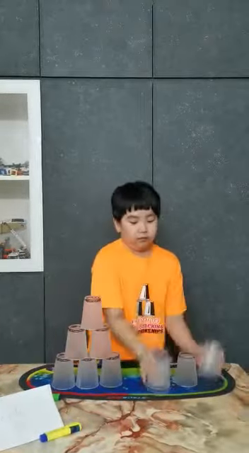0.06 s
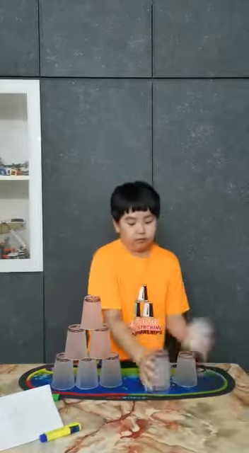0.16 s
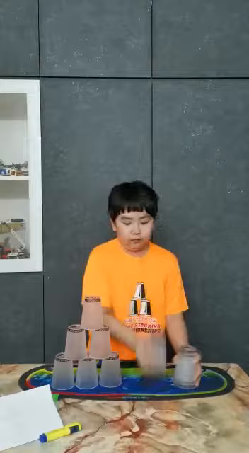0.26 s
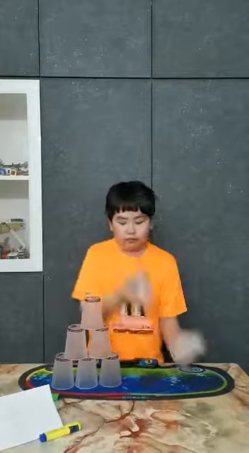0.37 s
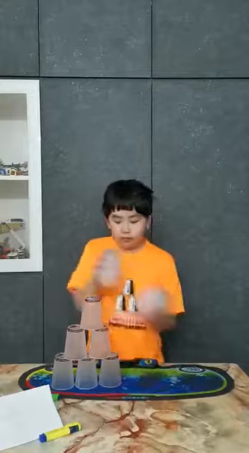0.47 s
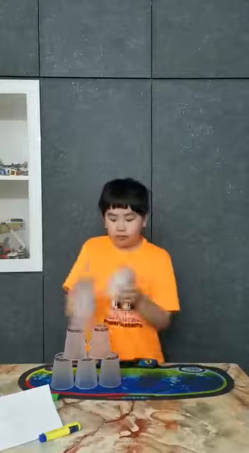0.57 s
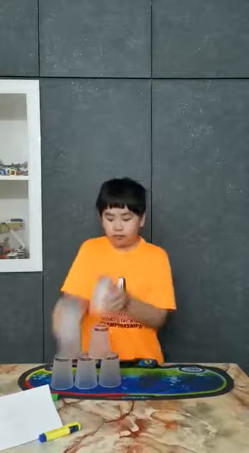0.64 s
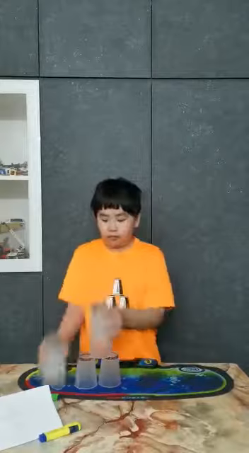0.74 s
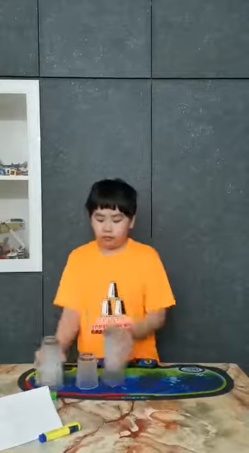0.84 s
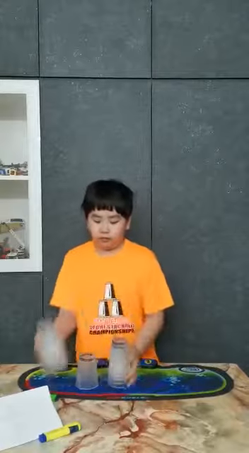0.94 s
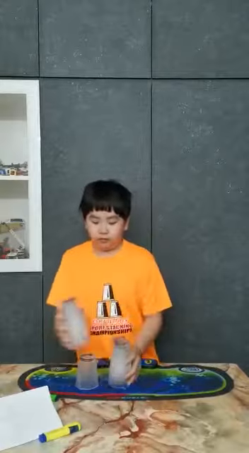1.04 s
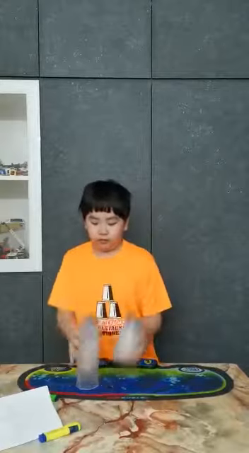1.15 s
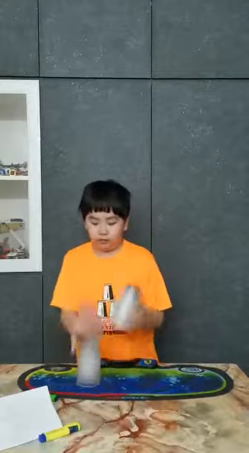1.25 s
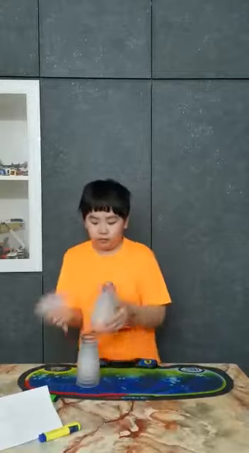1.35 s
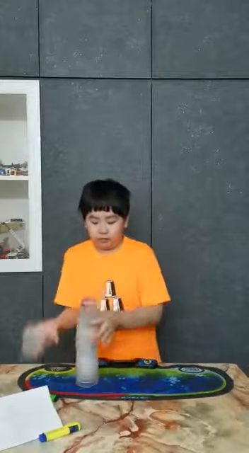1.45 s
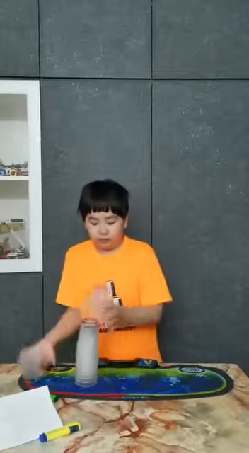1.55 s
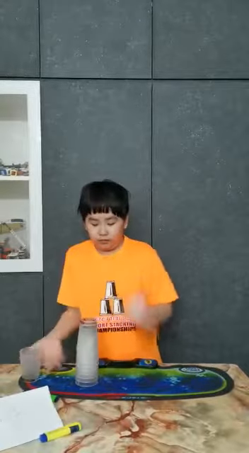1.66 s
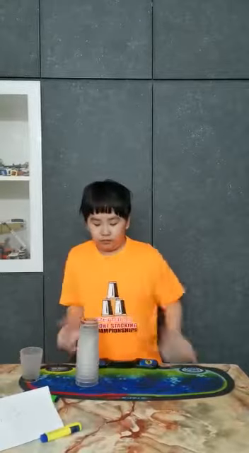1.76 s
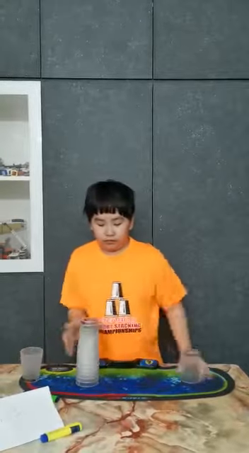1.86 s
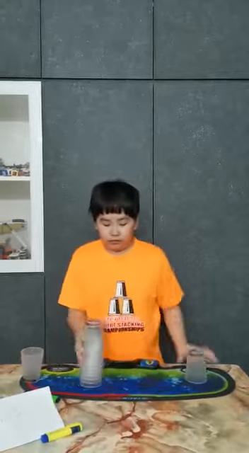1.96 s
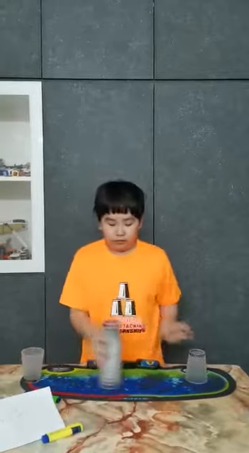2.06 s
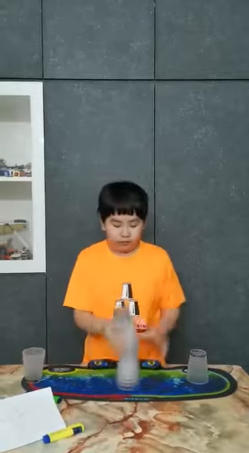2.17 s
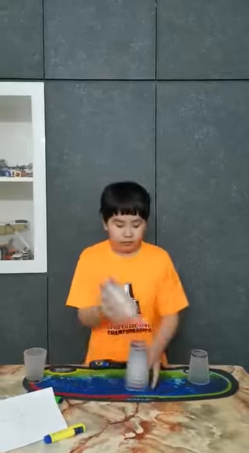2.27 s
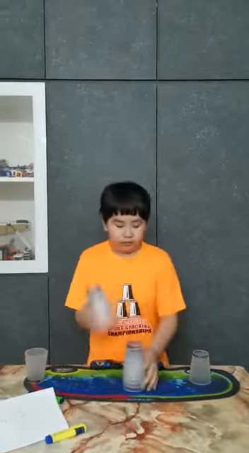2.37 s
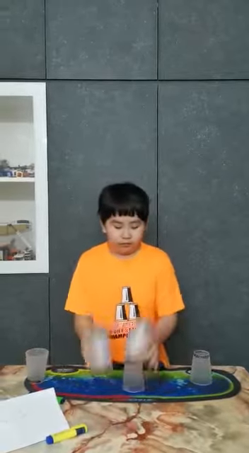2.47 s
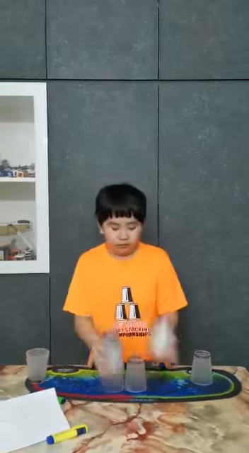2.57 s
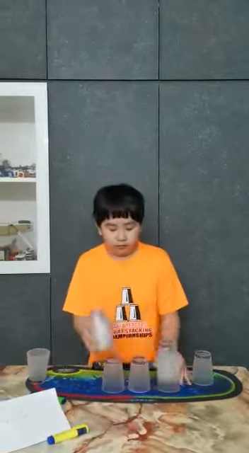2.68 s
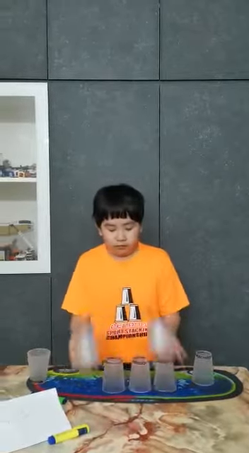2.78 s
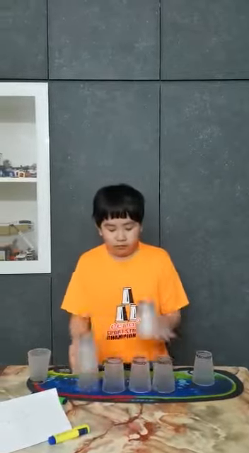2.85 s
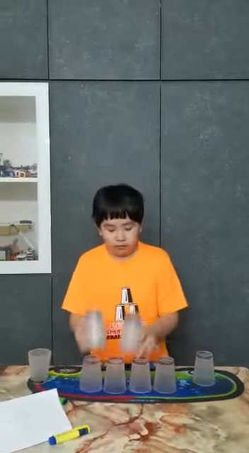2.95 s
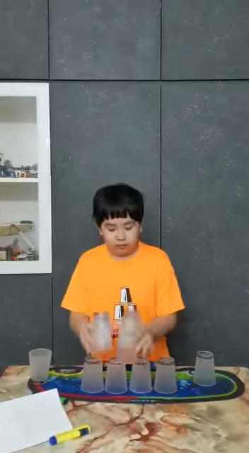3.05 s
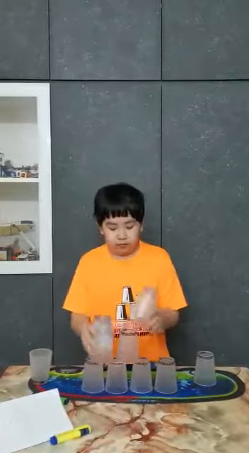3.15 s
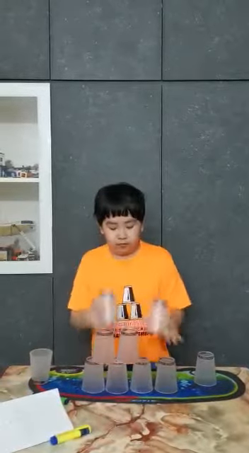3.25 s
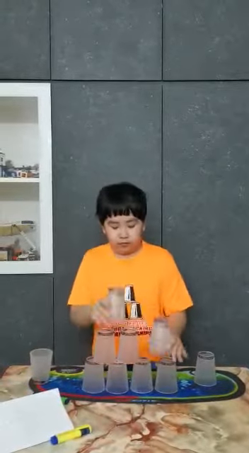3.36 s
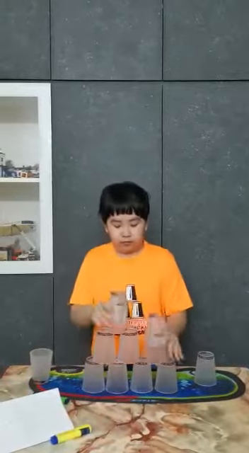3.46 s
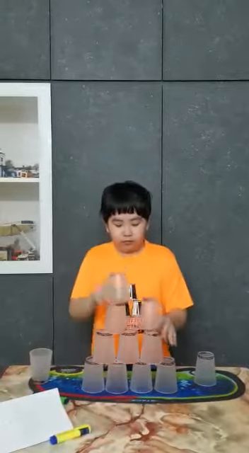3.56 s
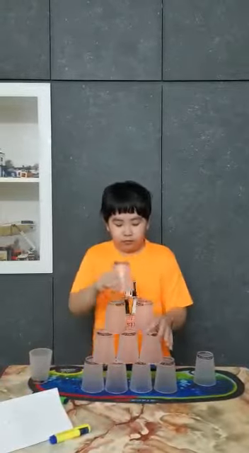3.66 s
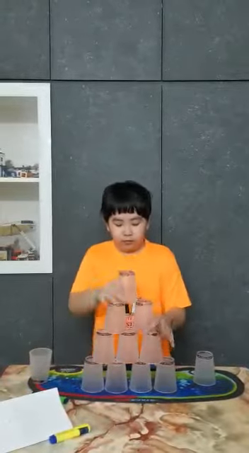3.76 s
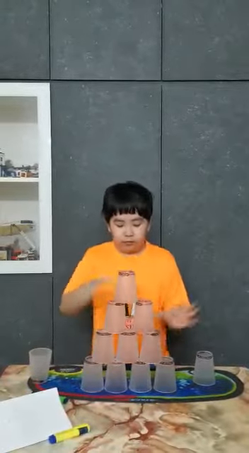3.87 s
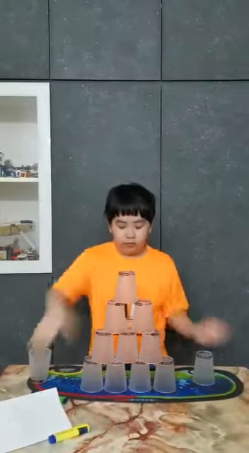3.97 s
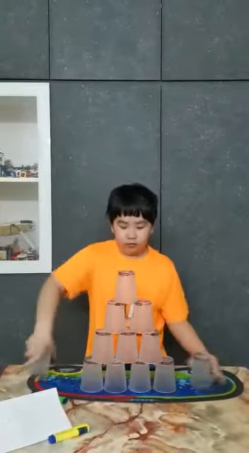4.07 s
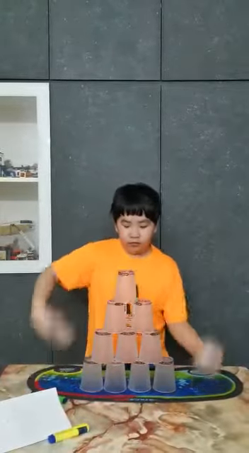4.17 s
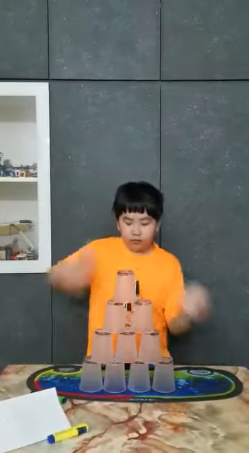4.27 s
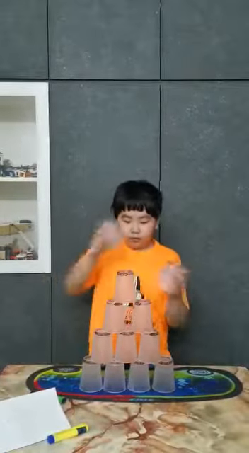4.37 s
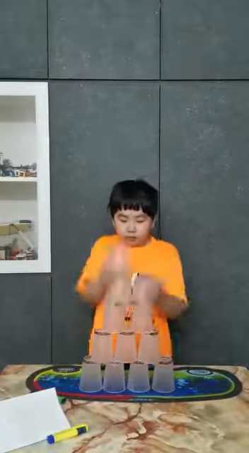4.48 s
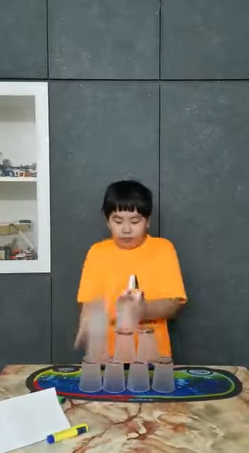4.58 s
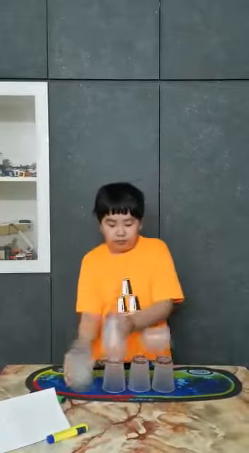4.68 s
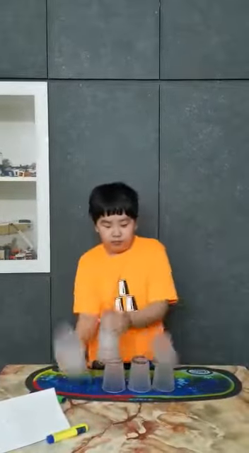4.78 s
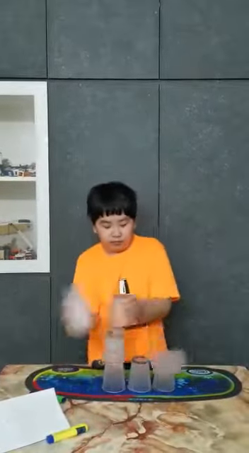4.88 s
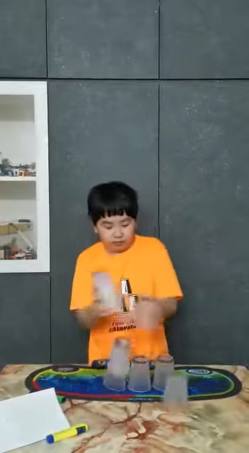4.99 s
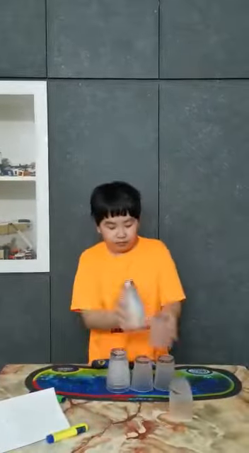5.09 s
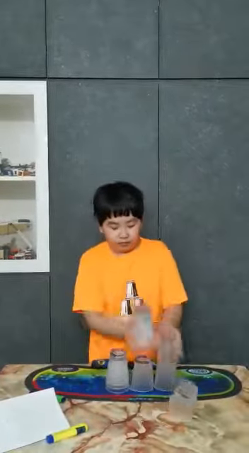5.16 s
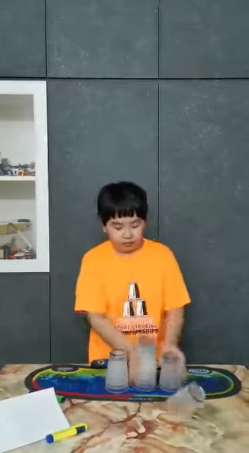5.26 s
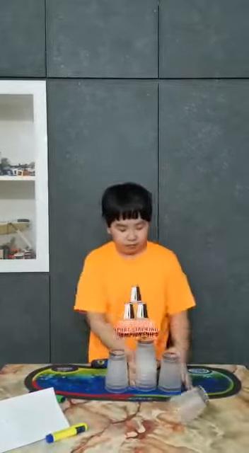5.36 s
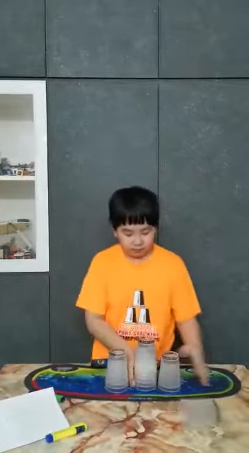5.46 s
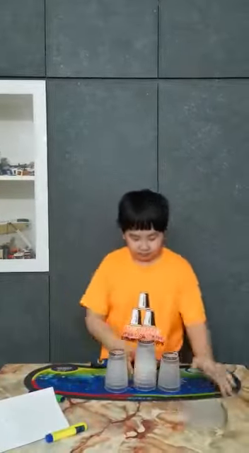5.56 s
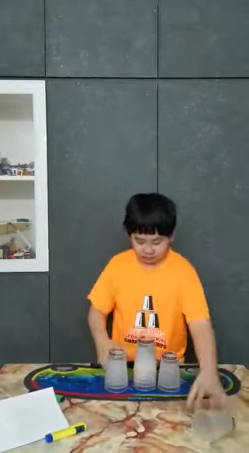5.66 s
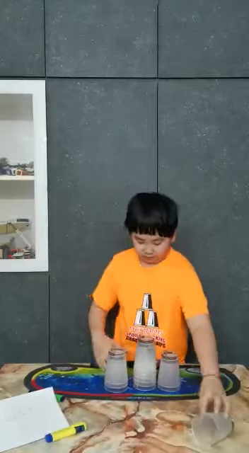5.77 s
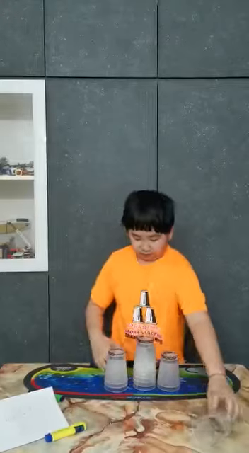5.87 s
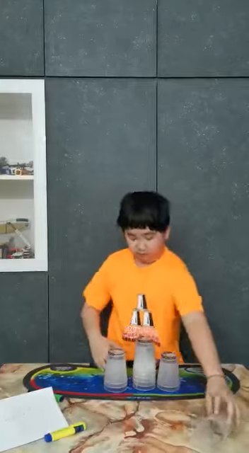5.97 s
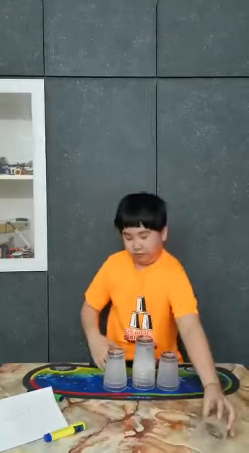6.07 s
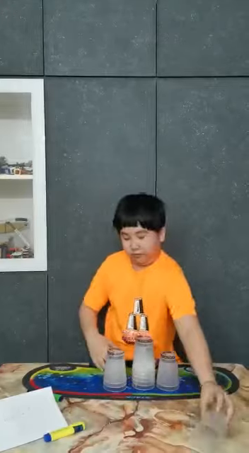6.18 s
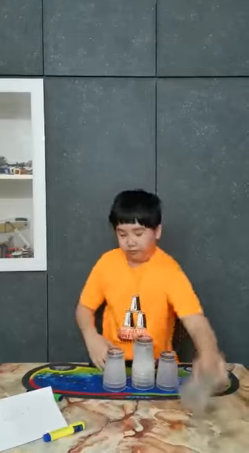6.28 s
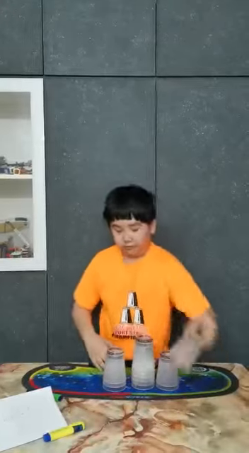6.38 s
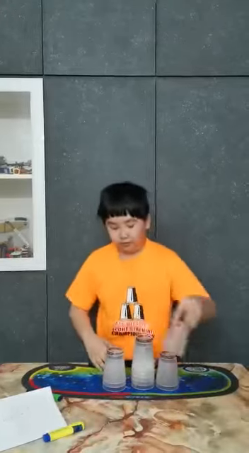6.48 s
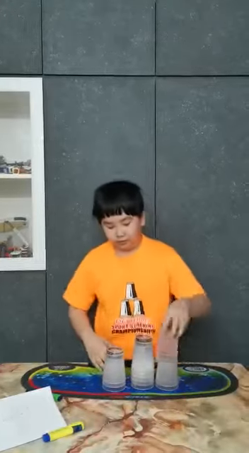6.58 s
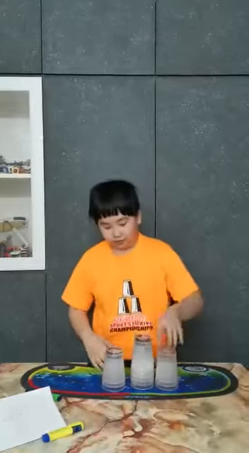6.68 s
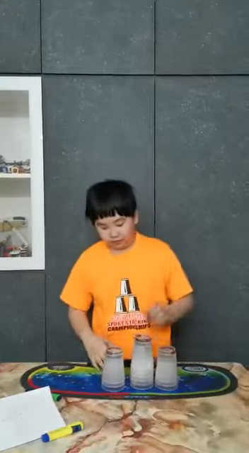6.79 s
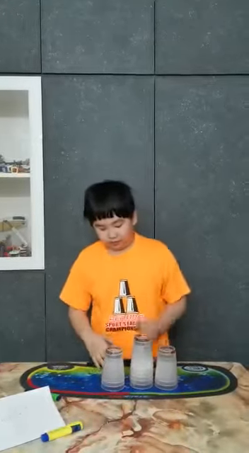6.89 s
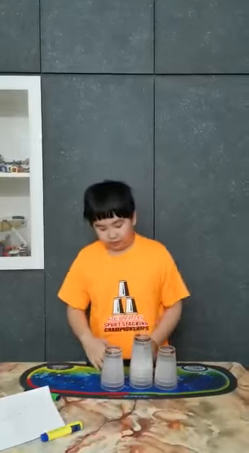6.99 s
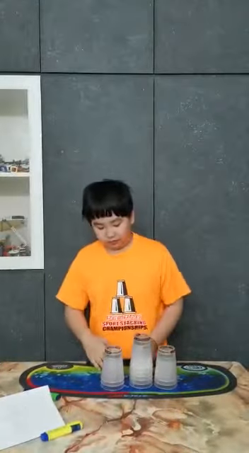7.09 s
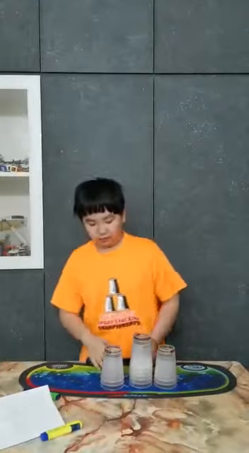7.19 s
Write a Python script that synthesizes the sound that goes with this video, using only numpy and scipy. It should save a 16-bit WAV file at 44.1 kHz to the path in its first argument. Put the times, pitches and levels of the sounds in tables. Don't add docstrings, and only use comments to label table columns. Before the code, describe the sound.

In a small hard-walled room, thin plastic cups are stacked at high speed on a soft mat about two metres from a phone. Dense bright clacks and hollow pops come in bursts, with a softer gap around two seconds and another near four. A hard collapsing flurry follows, then a loose cup bounces on the bare table in quickening ticks. Two separate knocks and faint touches end it over light hiss.

```python
import sys
import numpy as np
from scipy import signal
from scipy.fft import rfft, irfft
from scipy.io import wavfile
from scipy.ndimage import uniform_filter1d

SR = 44100
rng = np.random.default_rng(int(sys.argv[2]) if len(sys.argv) > 2 else 0)


def makeup_ratio(level_db):
    decades = np.asarray(level_db, float) / 20
    return 10 ** decades


def to_wav(sig):
    pcm = np.clip(np.atleast_2d(sig), -1, 1) * 32767
    pcm = np.round(pcm).astype(np.int16)
    wavfile.write(sys.argv[1], SR, pcm.T)


N = 318843
SPOTS = 3


def band(x, lo_hz, hi_hz):
    return signal.sosfilt(signal.butter(2, [lo_hz, hi_hz], "band", fs=SR, output="sos"), x)


def unit(x):
    return x / np.sqrt(np.mean(x ** 2))


def colour(table, hz):
    table_hz, level_db = np.transpose(table)
    return np.interp(np.log(hz + 1), np.log(table_hz), level_db)


def even(x, width_hz):
    n = x.shape[-1]
    spectrum = rfft(x)
    smooth_power = uniform_filter1d(np.abs(spectrum) ** 2, size=int(width_hz * n / SR) + 1)
    end = np.clip(np.linspace(4, -1, n), 0, 1)
    return end * irfft(spectrum / np.sqrt(smooth_power), n)


def ring(modes, rise_s, detune=0, scatter_db=0):
    t = np.arange(SR // 6) / SR
    out = np.zeros(len(t))
    for hz, level_db, t60_s in modes:
        level_chance, pitch_chance = rng.standard_normal(2)
        decay = np.exp(-np.log(1000) * t / t60_s)
        tone = np.sin(2 * np.pi * hz * (1 + detune * pitch_chance) * t)
        out += makeup_ratio(level_db + scatter_db * level_chance) * decay * tone
    out = out * (1 - np.exp(-t / rise_s))
    return out / np.max(np.abs(out))


def struck(events, modes, rise_s, gain_db):
    out = np.zeros((SPOTS, N + SR))
    for k, (start_s, level_db, pitch_hz) in enumerate(events):
        blow = ring([(pitch_hz * ratio, db, t60_s) for ratio, db, t60_s in modes], rise_s)
        i = int(start_s * SR)
        out[k % SPOTS, i:i + len(blow)] += makeup_ratio(level_db + gain_db) * blow
    return out[:, :N]


def pressure(strokes):
    t = np.arange(N) / SR
    out = np.zeros(N)
    for start_s, held_s, level_db in strokes:
        rise_db = 306 * np.maximum(start_s - t, 0)
        fall_db = 147.5 * np.maximum(t - start_s - held_s, 0)
        out += makeup_ratio(level_db - rise_db - fall_db)
    return out


# [hz, level_db per Hz]
WALL = [(1000, -39.5), (1700, 1), (2010, -6), (2860, -4.5), (3350, -2), (3750, -3), (4470, -0.5),
        (5690, -9.5), (6860, -10.5), (8260, -21.5), (9320, -18), (10100, -23.5), (12900, -27.5),
        (14400, -39), (15700, -50)]


def walls(x):
    cepstrum = irfft(np.log(makeup_ratio(colour(WALL, np.fft.rfftfreq(512, 1 / SR)))))
    cepstrum[1:256] *= 2
    cepstrum[257:] = 0
    response = irfft(np.exp(rfft(cepstrum)))
    return signal.fftconvolve(x, response[None] / np.max(np.abs(response)), axes=1)[:, :N]


def share(events, rim_db, table_db, crack_hz):
    return [(start_s, crack_db, pitch_hz, level_db, level_db + rim_db, level_db + table_db, crack_hz)
            for start_s, level_db, pitch_hz, crack_db in events]


# [start_s, level_db, pitch_hz of the hollow note, crack_db]
PERCHED = [(0.0355, -46, 450, -23), (0.0884, -31, 773, -14), (0.1117, -26, 306, -13.5),
           (0.6643, -39, 683, -27), (0.6863, -38.5, 670, -21.5), (0.7044, -30, 600, -22.5),
           (0.82, -26, 442, -15.5), (0.9837, -27.5, 480, -27), (1.0184, -22.5, 447, -18),
           (1.5231, -28.5, 490, -17.5), (1.6361, -24.5, 664, -17), (3.5304, -18.5, 520, -13.5),
           (3.7625, -23.5, 581, -22.5), (3.8597, -21.5, 610, -16), (4.362, -49.5, 500, -49),
           (4.5795, -41, 496, -21), (4.5875, -23, 532, -12.5), (4.6304, -25.5, 640, -11),
           (4.6547, -22, 670, -42), (4.7114, -24.5, 645, -13.5), (4.9194, -31, 586, -26.5),
           (5.0855, -24, 358, -15), (5.1494, -29, 754, -40), (5.3881, -29.5, 717, -13.5),
           (6.655, -26.5, 537, -25), (6.8193, -26.5, 612, -19.5)]


def perched():
    return share(PERCHED, rim_db=3.9, table_db=-11.5, crack_hz=(190, 13000))


# [start_s, level_db, pitch_hz of the hollow note, crack_db]
SLAMMED = [(0.0014, -30, 590, -25), (0.0487, -36.5, 477, -12.5), (0.1909, -25.5, 440, -14.5),
           (0.3844, -26.5, 760, -66), (0.7385, -25.5, 470, -18), (0.8807, -22.5, 525, -14),
           (1.0394, -29.5, 784, -47), (1.326, -24.5, 623, -15), (1.3794, -27.5, 386, -32),
           (1.6794, -27, 461, -58), (2.2821, -39.5, 352, -39), (4.2828, -65, 387, -35),
           (4.751, -24.5, 586, -12.5), (4.8477, -27.5, 662, -28)]


def slammed():
    return share(SLAMMED, rim_db=7.1, table_db=-2.8, crack_hz=(2150, 19845))


# [start_s, level_db, pitch_hz of the hollow note, crack_db]
NESTED = [(0.1294, -21.5, 330, -12.5), (0.3607, -25.5, 614, -11.5), (1.255, -21.5, 544, -16.5),
          (1.4494, -25, 434, -56), (2.2698, -75, 600, -30.5), (2.4394, -49.5, 306, -48),
          (2.6586, -21.5, 427, -27), (2.6653, -25, 640, -46), (2.8668, -32.5, 346, -34.5),
          (2.9417, -44, 370, -47), (3.1115, -14.5, 671, -19.5), (3.2408, -19, 576, -23),
          (3.5994, -24.5, 690, -23.5), (4.6644, -30, 724, -12), (4.8798, -27.5, 558, -22),
          (5.0492, -32, 470, -26), (5.0673, -30, 520, -28), (5.1327, -22.5, 812, -17),
          (5.1941, -26, 447, -17.5), (5.2912, -36, 384, -28), (5.3102, -20, 612, -17)]


def nested():
    return share(NESTED, rim_db=0.69, table_db=-13, crack_hz=(1600, 12600))


# [start_s, level_db, pitch_hz of the hollow note, crack_db]
SET_DOWN = [(0.2094, -27, 410, -45), (0.2995, -27, 683, -16.5), (0.315, -35, 426, -41),
            (0.339, -32.5, 306, -17), (0.9094, -24, 478, -23), (1.941, -31, 340, -37.5),
            (1.947, -23.5, 526, -42), (1.968, -20.5, 424, -30.5), (2.6774, -22, 447, -25.5),
            (2.7962, -17, 626, -24.5), (2.968, -14.5, 622, -20.5), (5.3444, -48, 560, -23.5),
            (5.4094, -26, 595, -51)]


def set_down():
    return share(SET_DOWN, rim_db=-3.5, table_db=-8, crack_hz=(260, 11400))


# [start_s, level_db, pitch_hz of the hollow note, crack_db]
FALLEN = [
    (5.6019, -34.5, 486, -16.5),
    (5.7107, -37.5, 446, -22),
    (5.7805, -43.5, 500, -20),
    (5.8048, -42.5, 506, -18),
    (5.8294, -41.5, 476, -36),
    (5.87, -54, 500, -39),
    (5.91, -75, 470, -31.5),
    (5.9838, -85, 470, -36),
]


def fallen():
    return share(FALLEN, rim_db=9.3, table_db=-12.5, crack_hz=(4460, 19845))


# [start_s, level_db, pitch_hz of the hollow note, crack_db]
HANDLED = [
    (2.3844, -45.5, 318, -46),
    (2.5624, -34.5, 537, -35),
    (2.5994, -67, 576, -62),
    (4.1605, -42, 324, -38),
    (4.1934, -32, 295, -29.5),
    (4.2094, -37.5, 617, -31.5),
    (4.235, -39.5, 325, -47),
    (7.0994, -41, 271, -60),
    (7.14, -52, 304, -67),
    (7.1894, -68, 360, -73),
]


def handled():
    return share(HANDLED, rim_db=-9, table_db=-4, crack_hz=(4600, 20000 - 155))


# [start_s, crack_db]
TICKS = [(2.248, -33.5), (2.534, -43), (2.542, -34), (2.554, -37), (3.369, -44), (5.28, -23), (5.929, -40),
         (6.22, -45), (6.252, -64), (6.4394, -52), (6.794, -33), (7.08, -35)]


def ticks():
    events = [(start_s, crack_db - 23, 434, crack_db) for start_s, crack_db in TICKS]
    return share(events, rim_db=0, table_db=0, crack_hz=(3800, 15000))


# [hz, level_db, t60_s]
RIM = [(937, -4, 0.025), (1136, -1.5, 0.016), (1260, -1, 0.016), (1437, 5.5, 0.008), (1670, 0, 0.0067),
       (2275, -4.5, 0.007), (2430, -25, 0.0039)]
# [hz, level_db, t60_s]
TABLE = [(78, 12.5, 0.013), (98, -3.5, 0.044), (143.4, -4, 0.088), (165.5, -7.5, 0.12), (202.4, 6, 0.051),
         (238.2, -15, 0.21)]


def knocks():
    rows = perched() + slammed() + nested() + set_down() + fallen() + handled() + ticks()
    rows.sort(key=lambda row: row[0])
    t = np.arange(SR // 40) / SR
    chatter = rng.standard_normal((len(rows), len(t))) * 0.37 * np.exp(-np.log(1000) * t / 0.023)
    chatter[:, 0] = 1
    chatter = even(chatter, 160)
    out, crack = np.zeros((2, SPOTS, N + SR))
    for k, (start_s, crack_db, hz, hollow_db, rim_db, table_db, crack_hz) in enumerate(rows):
        hollow = [(hz, 0, 0.026), (hz * 1.171, -2.5, 0.021), (hz * 1.44, -5, 0.02),
                  (hz * 0.8335, -3, 0.03), (hz * 0.616, -6, 0.03)]
        blow = makeup_ratio(rim_db - 0.5) * ring(RIM, 0.0011, detune=0.047, scatter_db=2.9)
        blow += makeup_ratio(hollow_db + 3.5) * ring(hollow, 0.0029, detune=0.053, scatter_db=2.77)
        blow += makeup_ratio(table_db - 2.5) * ring(TABLE, 0.024, detune=0.072, scatter_db=4.55)
        i = int(max(start_s, 0) * SR)
        out[k % SPOTS, i:i + len(blow)] += blow
        crack[k % SPOTS, i:i + len(t)] += makeup_ratio(crack_db + 2) * band(chatter[k], *crack_hz)
    return out[:, :N] + walls(crack)


# [start_s, level_db peak, pitch_hz]
CLACKS = [(0.035, -24, 1230), (0.0867, -26, 1240), (0.1114, -17.5, 1160), (0.19, -18, 1030),
          (0.3017, -38, 1320), (0.348, -26, 1190), (0.3628, -25, 1310), (0.6665, -19.5, 1140),
          (0.7032, -13.5, 1260), (0.7385, -22, 1120), (0.7865, -26, 1180), (0.819, -14, 926),
          (0.881, -10.5, 1644), (0.984, -19.5, 1320), (1.0193, -22, 1500), (1.255, -22.5, 975),
          (1.3254, -13, 1150), (1.5221, -21, 1310), (1.6372, -16.5, 1330), (1.947, -23.5, 976),
          (2.2836, -38, 1590), (2.6614, -14, 895), (2.7048, -34, 990), (2.7975, -39, 1110),
          (2.967, -16.5, 1064), (3.0703, -25, 1060), (3.112, -20, 1070), (3.24, -20, 1118),
          (3.5298, -14, 1000), (3.5653, -17.5, 1185), (3.6218, -23.5, 1280), (3.7626, -14.5, 1324),
          (3.8604, -9, 1385), (4.2847, -40, 1200), (4.3637, -36.5, 1110), (4.5889, -7, 1320),
          (4.7095, -12.5, 1143), (4.7496, -22, 1040), (4.8214, -21, 1060), (4.8499, -28, 966),
          (4.8704, -27, 1090), (5.0495, -38, 1340), (5.094, -13.5, 1295), (5.1328, -28, 1120),
          (5.3084, -18, 970), (5.3899, -18, 1527), (5.6028, -33, 1140), (5.6248, -23.5, 1185),
          (5.7104, -44, 1040), (6.6554, -16.5, 1206), (6.792, -38.5, 1550), (6.8194, -16, 1480)]


def rim_clacks():
    modes = [(0.9856, 0, 0.027), (0.853, 1, 0.011), (1.125, -7.5, 0.012)]
    return struck(CLACKS, modes, rise_s=0.00084, gain_db=-0.93)


# [start_s, level_db peak, pitch_hz]
POPS = [(0.134, -21, 466), (0.695, -14, 615), (1.262, -19.5, 630), (1.339, -20, 650), (1.689, -14, 410),
        (2.665, -3.5, 632), (2.802, -6.5, 670), (2.975, -5.5, 673), (3.12, -11, 634), (3.249, -19, 647),
        (3.537, -8.5, 474), (3.77, -14.5, 563), (3.867, -15, 690), (4.637, -8.5, 630), (4.919, -14.5, 650),
        (5.138, -11.5, 775), (5.317, -9.5, 570), (5.399, -17, 630), (6.663, -17.5, 537), (6.827, -22, 556)]


def pops():
    return struck(POPS, [(1, 0, 0.022), (1.2, -4, 0.009)], rise_s=0.00084, gain_db=-7)


# [start_s, level_db peak, pitch_hz]
TINKS = [(0.0353, -21, 4660), (0.0493, -22, 4930), (0.0677, -20, 4580), (0.0882, -17, 4530),
         (0.1111, -17, 4870), (0.1164, -11, 4500), (0.1915, -22, 3990), (0.2992, -24, 4530),
         (0.3421, -24, 4400), (0.3601, -18, 4700), (0.6704, -40, 4380), (0.6863, -27, 4640),
         (0.7387, -34, 4410), (0.82, -34, 4420), (0.8794, -17, 3690), (1.0191, -33, 3770),
         (1.254, -28, 4680), (1.3304, -26, 4000), (1.5219, -30, 4870), (1.6377, -24, 3530),
         (2.6569, -37, 4670), (2.6778, -30, 4900), (2.7955, -34, 4520), (2.9397, -36, 4970),
         (2.9662, -32, 3630), (3.0979, -38, 4650), (3.1118, -14.5, 4600), (3.24, -24, 4380),
         (3.5299, -11, 4650), (3.7614, -31, 4320), (3.8596, -24, 4500), (4.5875, -20, 4300),
         (4.6244, -21, 4310), (4.6538, -18, 4470), (4.7097, -26, 3740), (4.7506, -19, 4400),
         (4.8803, -29, 4520), (5.0664, -33, 4600), (5.0853, -18, 5010), (5.1322, -24, 5100),
         (5.2919, -27, 5030), (5.3088, -25, 4410), (5.3887, -17, 3570), (5.6017, -21.5, 5180),
         (5.7099, -23, 4900), (5.7793, -28, 4700), (5.8047, -25, 5530), (5.91, -40, 5300),
         (6.6543, -34, 4410), (6.6744, -43, 4350), (6.8199, -29, 4760)]


def tinks():
    modes = [(1, 1.5, 0.013), (1.07, -5, 0.0062), (1.45, -7.5, 0.0035)]
    return struck(TINKS, modes, rise_s=0.0002, gain_db=0)


# [start_s, level_db peak]
SNAPS = [(0.0358, -31), (0.052, -15.5), (0.191, -24), (0.2992, -36), (0.361, -14), (0.663, -27),
         (0.7372, -34), (0.82, -28), (0.8794, -29), (1.0166, -26), (1.254, -28), (1.3259, -44),
         (1.5304, -34), (1.6212, -39), (1.6347, -28), (1.942, -54), (2.5292, -58), (2.5461, -48),
         (2.5536, -38), (2.66, -37), (2.6778, -34), (2.7975, -39), (2.8664, -32), (2.9402, -46),
         (2.9704, -28), (3.114, -31), (3.24, -39), (3.5299, -29), (3.761, -41), (3.8621, -36),
         (4.1944, -41), (4.5875, -32), (4.7082, -26), (4.7506, -31), (4.8798, -31), (5.0484, -41),
         (5.065, -26), (5.0893, -18), (5.134, -25), (5.193, -32), (5.202, -23), (5.2804, -35),
         (5.3093, -28), (5.388, -30), (5.389, -15), (5.6033, -16.5), (5.7099, -30), (5.779, -25),
         (5.805, -22), (5.91, -36), (6.6548, -47), (6.796, -47), (6.8194, -26), (7.0803, -55.5)]


def snaps():
    out = np.zeros(N)
    for start_s, level_db in SNAPS:
        out[int(start_s * SR)] = makeup_ratio(level_db + 9.5)
    return band(out, 4200, 11000)


# [start_s of full pressure, held_s, level_db]
SLIDES = [(0.045, 0.053, -33), (0.345, 0.045, -42.5), (0.84, 0.11, -35.5), (1.33, 0.051, -38.5),
          (1.59, 0.072, -42.5), (2.1, 0.18, -60.5), (2.7, 0.34, -48), (3.33, 0.045, -58),
          (3.81, 0.037, -55), (4.189, 0.03, -51), (4.36, 0.12, -59), (4.61, 0.12, -46), (4.74, 0.11, -39),
          (5.1, 0.047, -57), (5.81, 0.032, -61), (4.87, 0.038, -51), (5.24, 0.19, -43.5),
          (5.75, 0.046, -67), (5.98, 0.2, -65), (6.8, 0.028, -54), (7.11, 0.014, -55)]


def slides():
    happens = rng.random((SPOTS, N)) < 900 / SR
    strength = makeup_ratio(-4 * np.log(rng.random((SPOTS, N)) + 0.043))
    tick_train = happens * strength * np.sign(rng.standard_normal(N))
    return pressure(SLIDES) * makeup_ratio(-14.5) * unit(walls(tick_train))


# [start_s, level_db peak, pitch_hz]
PINGS = [(0.1118, -24, 2250), (1.3245, -25, 3150), (1.6362, -25, 1910), (3.241, -30, 4370),
         (4.6553, -16.5, 2130), (4.6643, -34, 2160), (4.6794, -37, 2170), (4.7516, -25.5, 1900),
         (5.0839, -27, 2660), (5.1327, -21.5, 1820), (5.2024, -26.5, 1830), (5.3885, -29, 2480),
         (5.7798, -37, 1980), (5.8047, -31.5, 2020), (5.821, -49, 2430), (6.7983, -48, 4750),
         (7.0984, -52, 3230), (6.655, -34, 2550), (5.79, -37, 2100), (5.812, -36, 2150),
         (5.826, -38.5, 2280), (0.06, -29, 3200), (1.2545, -32, 1740), (1.64, -26.5, 2420),
         (0.361, -24, 2200), (3.2405, -30, 1850), (5.912, -50, 6900), (5.99, -57, 6920), (5.78, -37, 6900)]


def pings():
    return struck(PINGS, [(1, -2, 0.011), (1.09, -2, 0.0039)], rise_s=0.00017, gain_db=3.5)


# [start_s, level_db peak, pitch_hz]
THUMPS = [(0.183, -22, 130), (0.888, -27.5, 144), (1.06, -32, 116), (1.339, -28, 64.6), (2.288, -39, 149),
          (2.448, -54, 144), (4.199, -41, 114), (5.383, -24.5, 115), (5.431, -36, 128), (7.139, -43, 139),
          (7.19, -43, 126)]


def thumps():
    return struck(THUMPS, [(1, -3, 0.063), (1.4, 2, 0.029)], rise_s=0.0042, gain_db=-3.5)


# [start_s, level_db peak, pitch_hz]
SINGING = [(5.604, -35, 478), (5.712, -38, 504), (5.782, -32.5, 483), (5.806, -33.5, 487),
           (5.832, -41, 490), (5.3, -46.5, 470), (5.915, -61, 480), (5.99, -51, 5200), (6.3, -54, 5220),
           (7.7, -57, 2150), (7.08, -55, 1900), (3.862, -40, 1404), (1.523, -28, 900), (1.64, -31, 940),
           (0.96, -36, 950), (5.985, -58, 5200)]


def singing():
    return struck(SINGING, [(1, -6, 0.1), (1.02, -9, 0.058)], rise_s=0.0018, gain_db=-6)


# [hz, t60_s, level_db, left-right likeness 0-1]
ROOM = [(83, 0.9, -8, 0), (172, 0.53, 2, 1), (348.6, 0.32, 7, 0.74), (655, 0.3, 7.5, 0.22),
        (1323, 0.39, 2, 0), (2675, 0.28, 4.5, 0.05), (6280, 0.31, 0.5, 0.04), (10280, 0.21, 10, 0)]


def room():
    t = np.arange(int(0.7 * SR)) / SR
    onset = np.clip((t - 0.004) / 0.0018, 0, 1)
    early = makeup_ratio(11 * np.exp(-t / 0.0083))
    out = 0
    for hz, t60_s, level_db, like in ROOM:
        fade = np.exp(-np.log(1000) * t / t60_s) * onset * early
        tails = even(rng.standard_normal((2, len(t))) * fade, 40) * onset
        mid, side = unit(band(tails, hz / np.sqrt(2), hz * np.sqrt(2))) / np.sqrt(len(t))
        pair = np.sqrt(1 + like) * mid + np.sqrt(1 - like) * side * np.array([[1], [-1]])
        out = out + makeup_ratio(level_db) * np.sqrt(hz / SR) * pair
    return out


# [hz, left minus right level_db]
PORTS = [(60, -2.0), (110, 0.0), (200, 2), (380, -1.0), (700, 5), (1290, -4), (2380, 0.5), (4400, -5),
         (8120, 3), (15000, -1.5)]


def ports(x):
    db = colour(PORTS, np.fft.rfftfreq(N, 1 / SR))
    return irfft(rfft(x) * makeup_ratio(np.array([db, -db]) / 2), N)


# [start_s, left minus right level_db]
PLACE = [
    (0.0, -2.5),
    (1.49, -0.5),
    (2.25, -2.5),
    (3.2, -1.5),
    (4.39, -0.5),
    (4.89, 2),
    (5.48, 3.5),
    (5.98, 1),
    (7.23, 1),
]


def place(x):
    pan_db = np.interp(np.arange(N) / SR, *np.transpose(PLACE))
    return x * makeup_ratio(np.array([pan_db, -pan_db]) / 2)


# [start_s of full pressure, held_s, level_db]
RUSTLES = [
    (2.05, 0.36, -66),
    (2.27, 0.019, -78),
    (2.55, 0.052, -58.5),
    (4.17, 0.19, -66),
    (5.9, 0.047, -53.5),
    (6.05, 0.17, -80),
]


def rustle():
    low, high = rng.standard_normal((2, 2, N))
    return pressure(RUSTLES) * unit(band(low, 4800, 5200) + band(high, 6200, 8300))


# [hz, level_db per Hz]
HISS = [(15, -25.5), (25, -13), (27, 3), (55, 2), (144, 2), (289, 2), (552, -5.5), (666, -4.5),
        (1270, -13.5), (4040, -24.5), (5430, -26), (10100, -35), (15500, -37)]


def hiss():
    hz = np.fft.rfftfreq(N, 1 / SR)
    mid, side = rfft(rng.standard_normal((2, N))) * makeup_ratio(colour(HISS, hz))
    side = side * np.clip(hz / 600 + 30 / (hz + 1) - 0.3, 0, 1)
    return makeup_ratio(-56.5) * unit(irfft(np.array([mid + side, mid - side]), N))


def duck(cups):
    keep = np.exp(-1 / (0.12 * SR))
    loud = signal.lfilter([1 - keep], [1, -keep], cups ** 2)
    return (1 + loud / makeup_ratio(-100)) ** -0.15


def scene():
    spots = knocks() + slides() + pings() + thumps() + singing()
    tink, rim, pop = tinks(), rim_clacks(), pops()
    cups = (spots + tink + rim + pop).sum(axis=0) + snaps()
    to_room = spots + makeup_ratio(-12) * tink + makeup_ratio(-2.5) * rim + makeup_ratio(-3) * pop
    direct = np.array([np.roll(cups, 6), cups]) * makeup_ratio(1.5)
    echo = sum(signal.fftconvolve(spot[None], room(), axes=1)[:, :N] for spot in to_room)
    near = signal.sosfilt(signal.butter(6, 58, "high", fs=SR, output="sos"), direct + echo)
    return place(ports(near)) + duck(cups) * hiss() + rustle()


def roll_off(x):
    return signal.sosfilt(signal.butter(12, 15830, fs=SR, output="sos"), x)


def record(dry):
    mix = signal.sosfilt(signal.butter(2, 35, "high", fs=SR, output="sos"), dry)
    mix = signal.sosfilt(signal.ellip(6, 0.2, 50, 15700, fs=SR, output="sos"), mix)
    return roll_off(mix)


dry = scene()
out = record(dry)
to_wav(out)
```